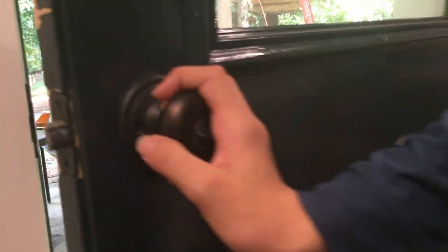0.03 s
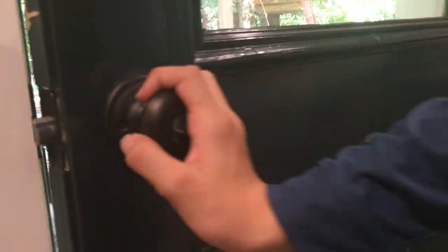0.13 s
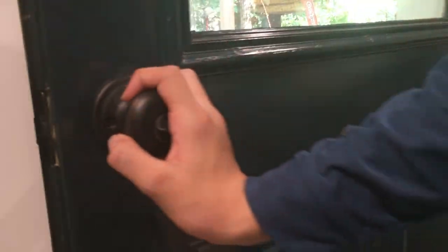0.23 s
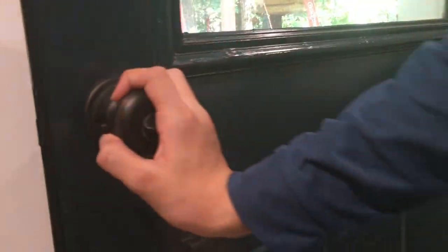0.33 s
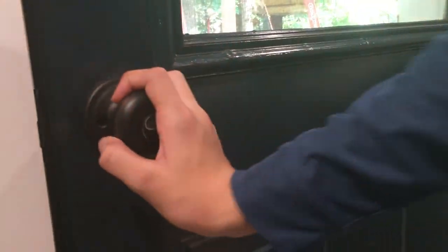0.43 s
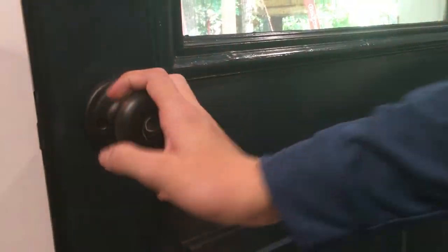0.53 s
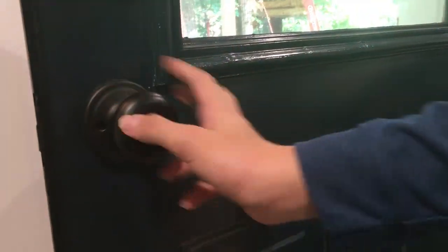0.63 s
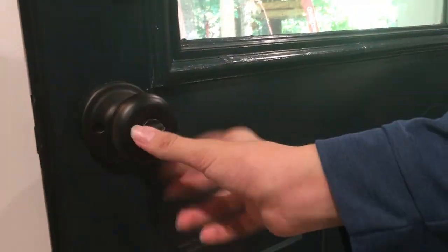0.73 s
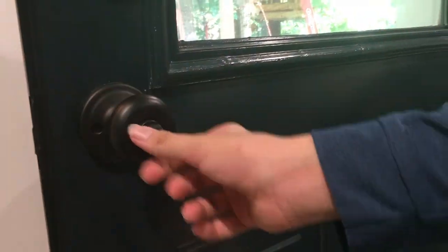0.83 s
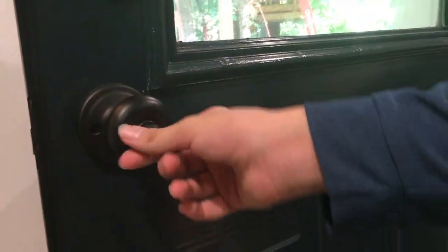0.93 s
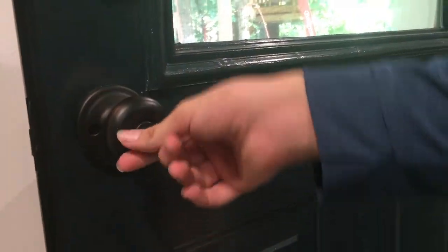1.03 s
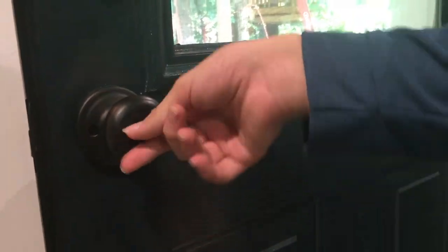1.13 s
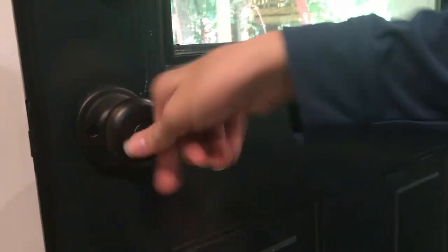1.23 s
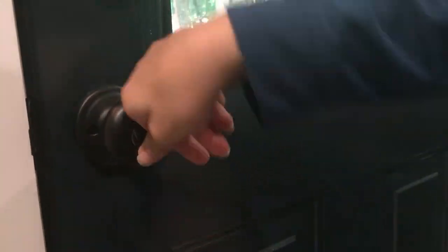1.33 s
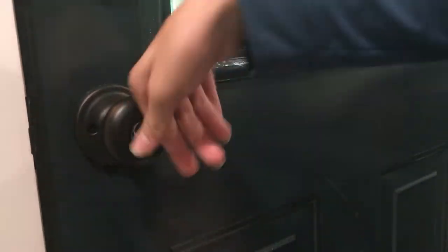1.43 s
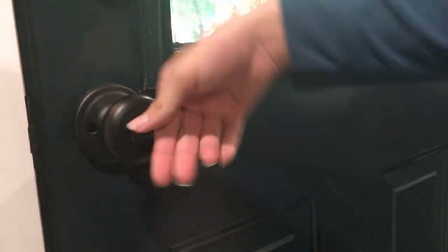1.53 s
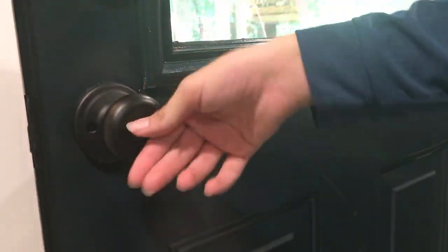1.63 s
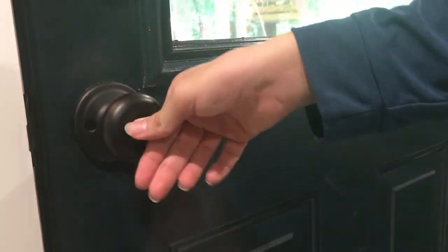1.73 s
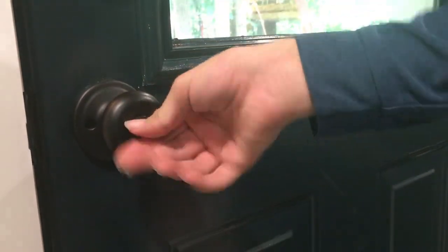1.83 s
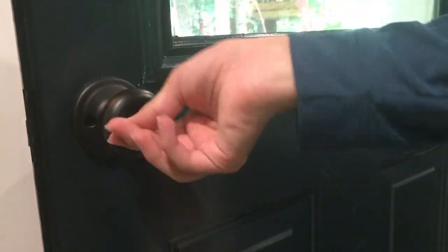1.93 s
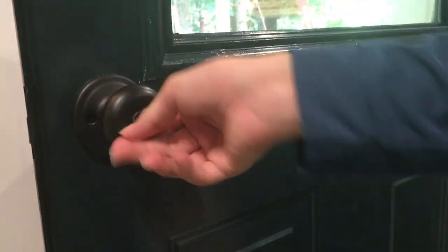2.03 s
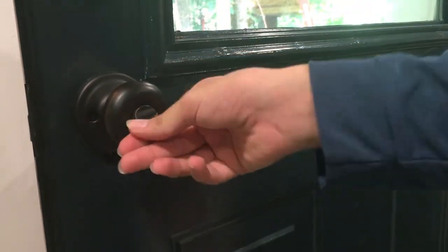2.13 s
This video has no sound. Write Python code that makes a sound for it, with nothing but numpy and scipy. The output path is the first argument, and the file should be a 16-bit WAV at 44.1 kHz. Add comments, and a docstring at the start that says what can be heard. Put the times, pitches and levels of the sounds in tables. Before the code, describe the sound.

A door shuts close by in a small, quiet hallway. Latch clacks hit the strike plate at 0.19-0.3 s, then the loudest woody thud and sharp metal snap at 0.37-0.38 s, with a low boom fading and final clacks by 0.44 s. Soft ticks follow at 0.6-0.9 s, clearer loose knob clicks at 1.14-1.64 s, brief low creaks near 1.67 and 2.09 s, and faint clicks around 2.0 s.

```python
"""House door shut by its knob

Close by, the latch meets the strike plate, the door thuds into its frame and the bolt snaps home. The hand
lets go, then fingers turn the lock button in the knob. Contacts are shaped noise bursts plus decaying tones;
thuds are low modes; slides, hiss, cloth and groans are swelling noise. A small hallway rings after every contact."""
import sys
import numpy as np
from scipy import signal
from scipy.fft import rfft, irfft, next_fast_len
from scipy.io import wavfile
from scipy.ndimage import uniform_filter1d, map_coordinates

SR = 44100
rng = np.random.default_rng(int(sys.argv[2]) if len(sys.argv) > 2 else 0)


def store_wav(level_fs):
    """Save 16-bit WAV to argv[1]."""
    pcm = np.round(np.clip(np.atleast_2d(level_fs), -1, 1) * 32767)
    wavfile.write(sys.argv[1], SR, pcm.T.astype(np.int16))


N = 97020  # length [samples]

# Still air of the house: (frequency [Hz], level [dB])
AIR_COLOUR = [(25, -8), (92, -1.5), (400, -11.5), (900, -22.5), (2840, -26.5), (5000, -35), (10100, -24.5),
              (16000, -47)]
AIR_DB = -65.5

# Decay of the hallway tail: (frequency [Hz], t60 [s])
HALL_T60 = [(100, 1), (400, 0.19), (1500, 0.5), (4000, 0.34), (10000, 0.27), (15000, 0.45)]
# Hallway tail over the direct sound: (frequency [Hz], level [dB])
HALL_LEVEL = [(80, -1.5), (300, -6), (1000, -6.5), (2500, -15), (6000, -13), (15000, -22)]
EARLY_DB, EARLY_T60_S, WALL_RISE_S = -8.5, 0.074, 0.0013

# Sleeve and door moving: (middle [s], half length [s], level [dB])
SWISHES = [(.05, 0.056, -64), (.16, 0.02, -87), (.32, 0.093, -47), (1.08, 0.05, -67.5),
           (1.92, 0.083, -66.5), (2.12, 0.13, -68.5)]
# Colour of that movement: (frequency [Hz], level [dB])
SWISH_COLOUR = [(40, -9), (150, 2), (400, -3), (1500, -12.5), (3000, -17.5), (4200, -29), (7000, -24),
                (11000, -27.5), (16000, -41.5)]
# Metal and skin sliding, and the slam's fading treble hiss (.505): (middle [s], half length [s], level [dB])
SLIDES = [(.435, 0.0029, -37), (.505, 0.042, -61), (.592, 0.0098, -58.5), (.707, 0.0047, -64.5),
          (1.905, 0.038, -64), (1.995, 0.024, -67)]
# Colour of the sliding and the hiss: (frequency [Hz], level [dB])
SLIDE_COLOUR = [(500, -20.5), (2500, -12), (4500, -15.5), (6500, -5), (8000, -6.5), (10500, 1.5),
                (12500, -16), (16000, -20.5)]
# The bolt rubs in its case: (middle [s], half length [s], level [dB])
SCRAPES = [(1.128, 0.0033, -58.5), (1.305, 0.0092, -61)]
# Colour of the bolt's rub: (frequency [Hz], level [dB])
SCRAPE_COLOUR = [(500, -24.5), (1500, -10.5), (2800, 5.5), (4200, -15.5), (6500, -9.5), (16000, -39)]
# Hinge and spindle groan as they turn: (middle [s], half length [s], level [dB], pitch [Hz])
GROANS = [(.11, 0.06, -65.5, 792), (1.672, 0.02, -51.5, 285), (1.895, 0.016, -63, 520),
          (1.961, 0.055, -65, 329), (2.093, 0.015, -50.5, 341)]
GROAN_WIDTH_HZ = 53  # 6 dB down this far from the pitch

# The leaf meets the bolt, the seal, then the frame: (time [s], leaf flex [dB], hallway boom [dB])
THUDS = [(0.194, -27.5, -55.5), (0.301, -37.5, -53), (.384, -25.5, -27.5)]
# Flexing of the door leaf: (frequency [Hz], level [dB], t60 [s])
LEAF_MODES = [(70, -15.5, 0.46), (126, 3.5, 0.15), (171, -13.5, 0.16)]
LEAF_RISE_S = 0.0048
# Low modes of door and hallway: (frequency [Hz], level [dB], t60 [s], rise [s])
DOOR_MODES = [(66.8, 4.5, .6, 0.0047), (130.8, 1, 0.64, 0.026), (171.8, -3.5, 0.56, 0.021),
              (197.8, -15.5, .9, 0.011), (243, -12, 0.42, 0.0033)]
# Colour of the boom: (frequency [Hz], level [dB])
BOOM_COLOUR = [(20, -24.5), (40, -2), (70, 1), (115, 3), (200, -14.5), (700, -62.5)]
BOOM_DB, BOOM_T60_S, BOOM_RISE_S = 2, 0.59, 0.0051  # level is over the hallway boom of each thud

# Latch and door strike the frame: (time [s], steel tick [dB], tick centre [Hz], lock clack [dB],
# clack centre [Hz], door wood [dB])
STRIKES = [ (.1862, -37.5, 5740, -32, 2700, -53.5), (.1922, -67.5, 7180, -36, 2050, -37.5),
           (.2117, -27, 5935, -32, 2620, -42), (.2131, -25, 10280, -39, 2486, -39.5),
           (.25, -38, 7186, -48.5, 2073, -45), (.3025, -78.5, 8070, -44, 1004, -50.5),
           (.3658, -19.5, 8845, -29, 2239, -29), (.3672, -31.5, 6883, -21.5, 800, -18.5),
           (.3688, -28.5, 6714, -21, 2096, -26), (.3798, -34.5, 7660, -15.5, 2400, -29.5),
           (.3811, -24.5, 8460, -27.5, 2543, -34.5), (.4242, -42.5, 7280, -28.5, 2430, -37.5),
           (.4425, -39.5, 7000, -34, 1830, -37)]
# Fingers leave the knob, then turn its lock button: (time [s], steel tick [dB], tick centre [Hz],
# knob clack [dB], clack centre [Hz], door wood [dB])
KNOB_CLICKS = [ (.6010, -45, 11800, -71, 2507, -62), (.6457, -58, 13080, -66, 2465, -79),
               (.8847, -54, 6440, -59.5, 2580, -61.5), (1.1408, -68, 8900, -47, 946, -42.5),
               (1.2122, -47.5, 7800, -36, 1050, -45), (1.2282, -49, 8600, -37.5, 2155, -37),
               (1.233, -69, 8930, -40.5, 890, -42), (1.2732, -58.5, 8900, -57, 1986, -81),
               (1.3158, -59, 7000, -41, 1870, -39.5), (1.3225, -59, 6410, -37.5, 682, -43.5),
               (1.466, -65, 6980, -56.5, 1820, -85), (1.5390, -60.5, 7870, -44, 2043, -46),
               (1.5440, -65.5, 7980, -41, 1583, -54.5), (1.6380, -65.5, 9900, -47.5, 1030, -47),
               (1.986, -66, 8970, -54, 1006, -53), (2.0418, -51, 9000, -52.5, 2550, -52),
               (2.063, -67, 7980, -55, 1430, -52), (2.079, -56.5, 9300, -55, 2340, -58)]

# Colour of the steel tick: (frequency [Hz], level [dB])
TICK_COLOUR = [(1500, -43.5), (4000, -11.5), (5000, -1.5), (6400, -0.5), (7500, -5.5), (8800, -4),
               (10200, 2.5), (12000, -2.5), (13500, -15.5), (16000, -12)]
# Colour of the lock clack: (frequency [Hz], level [dB])
LOCK_COLOUR = [(150, -30.5), (500, 3.5), (1600, 1), (2400, -4.5), (3150, -5), (4000, -13.5), (5500, -9.5),
               (9000, -40.5)]
# Colour of the knob clack: (frequency [Hz], level [dB])
KNOB_COLOUR = [(200, -10), (520, 9.5), (800, -3), (1600, -6), (2400, -6), (3300, -8.5), (4000, -18),
               (9000, -67)]
# Colour of the door's wood: (frequency [Hz], level [dB])
WOOD_COLOUR = [(40, -17.5), (110, -1), (200, 0.5), (340, -2.5), (430, -5), (800, -7), (1500, -37.5),
               (4000, -57.5)]
TICK_T60_S, CLACK_T60_S, WOOD_T60_S = 0.0019, 0.0059, 0.088
TICK_RISE_S, CLACK_RISE_S, WOOD_RISE_S = 0.00047, 0.0004, 0.00074
# The first clean push of a contact, over the noise that follows [dB]
TICK_SNAP_DB, CLACK_SNAP_DB, WOOD_SNAP_DB = -8, -4.5, -5.5
TICK_OCTAVES, CLACK_OCTAVES = 0.88, 1.2  # width of the emphasis round the centre
EMPHASIS_DB = 25.5  # depth of a contact's emphasis
AFTER_DB, AFTER_LONGER = -17, 7.1  # after the crack, the part shivers on softer and this many times longer
EVEN_HZ = 890  # the noise is evened out over stretches this wide before it is coloured

# Narrow peaks that colour the strikes, as two like hits close together do:
# (frequency [Hz], level [dB], t60 [s])
STRIKE_PEAKS = [(1033, -20, .14), (1348, -20, .16), (1848, -22, .14), (2014, -20, .13), (2197, -18, .14),
                (2283, -20, .15), (2441, -20, .15), (3080, -19, .06)]
# Ringing of the free knob, which sags in pitch as it fades: (frequency [Hz], level [dB], t60 [s])
KNOB_MODES = [(540, -16, .1), (690, -17, .11), (1080, -23, .08), (1580, -16, .17), (1690, -14.5, .19)]
# Ringing of the latch spring: (frequency [Hz], level [dB], t60 [s])
SPRING_MODES = [(4450, -22, .04), (6126, -33, .25), (6350, -20, .08)]
# Ringing of the door panel round the lock: (frequency [Hz], level [dB], t60 [s])
PANEL_MODES = [(243, -14.5, .12), (298.6, -13.5, .18), (375.8, -11.5, .22)]
STRIKE_PEAKS_DB, KNOB_RING_DB = -4, 2.5  # tones over the clack
RING_WIDTH_HZ = 8.8  # loose parts never ring quite pure
KNOB_SAG_PER_S = 1.1  # share of the pitch lost each second
DETUNE = 0.02203  # share of pitch: the loose knob sits a little differently at each contact

LOW_CUT_HZ, TOP_HZ = 24, 16300


def amp(db):
    """Turn dB into gain."""
    return 10 ** (np.asarray(db) / 20)


def unit(x):
    """Scale to rms 1."""
    return x / np.sqrt(np.mean(x ** 2) + 1e-20)


def along(points, hz):
    """Read (frequency, value) points on a log frequency axis."""
    f, value = np.transpose(points)
    return np.interp(np.log(hz + 1), np.log(f + 1), value)


def coloured(x, curve_db):
    """Causal minimum-phase filter whose gain in dB is a function of frequency."""
    m = 2 * next_fast_len(len(x))
    cepstrum = irfft(np.log(amp(curve_db(np.fft.rfftfreq(m, 1 / SR))) + 1e-6))
    # Folding the cepstrum forward puts the whole response after the input
    cepstrum[1:m // 2] *= 2
    cepstrum[m // 2 + 1:] = 0
    return irfft(rfft(x, m) * np.exp(rfft(cepstrum)))[:len(x)]


def noise(spectrum, size=N):
    """Coloured noise of rms 1."""
    return unit(coloured(rng.standard_normal(size), lambda hz: along(spectrum, hz)))


def fall(t, t60, rise):
    """Quick rise, exponential decay."""
    return (1 - np.exp(-t / rise)) * np.exp(-np.log(1000) * t / t60)


def swell(t, middle, half):
    """Bell-shaped swell and fade round a middle."""
    return np.exp(-.5 * ((t - middle) / half) ** 2)


def add(track, s, sound):
    """Mix a sound in at time s."""
    i = round(s * SR)
    track[i:i + len(sound)] += sound[:N - i]


def house_air():
    """Steady coloured noise: the quiet of the house."""
    return amp(AIR_DB) * noise(AIR_COLOUR)


def hallway(x):
    """Direct sound, close reflections and a tail that dies by frequency."""
    t = np.arange(len(x)) / SR
    hz, s, z = signal.stft(rng.standard_normal(len(x)), SR, nperseg=256)
    t60 = along(HALL_T60, hz)[:, None]
    # The root gives each decay an energy of 1, so the level does not hang on its length
    gain = amp(along(HALL_LEVEL, hz))[:, None] * np.sqrt(2 * np.log(1000) / (t60 * SR))
    decaying = z * gain * np.exp(-np.log(1000) * s / t60)
    tail = signal.istft(decaying, SR, nperseg=256)[1][:len(x)]
    early = rng.standard_normal(len(x)) * fall(t, EARLY_T60_S, WALL_RISE_S)
    early = amp(EARLY_DB) * early / np.linalg.norm(early)
    answer = tail * (1 - np.exp(-t / WALL_RISE_S)) + early
    return x + signal.fftconvolve(x, answer)[:len(x)]


def rubbing(strokes, spectrum, grain_db, grains_per_s):
    """Strokes of noise that swell and fade, their level flickering at random in dB."""
    t = np.arange(N) / SR
    level = sum(amp(db) * swell(t, middle, half) for middle, half, db in strokes)
    grain = map_coordinates(rng.standard_normal(N), [t * grains_per_s], order=1)
    return level * unit(noise(spectrum) * amp(grain_db * grain))


def sleeve():
    """Sleeve and door brush past as soft, broad noise."""
    return rubbing(SWISHES, SWISH_COLOUR, grain_db=2, grains_per_s=200)


def slides():
    """Fine-grained slides and the slam's fading treble hiss; the bolt scrapes with a rougher, faster grain."""
    slides_and_hiss = rubbing(SLIDES, SLIDE_COLOUR, grain_db=3.0, grains_per_s=200)
    bolt = rubbing(SCRAPES, SCRAPE_COLOUR, grain_db=7.0, grains_per_s=1100)
    return hallway(slides_and_hiss + bolt)


def groans():
    """A turning part rubs out a short, low, rough note: noise narrowed round a pitch."""
    out, t = np.zeros(N), np.arange(N) / SR
    for middle, half, db, pitch_hz in GROANS:
        note = coloured(rng.standard_normal(N),
                        lambda hz: -20 * np.log10(1 + ((hz - pitch_hz) / GROAN_WIDTH_HZ) ** 2))
        out += amp(db) * swell(t, middle, half) * unit(note)
    return out


def low_mode(t, hz, db, t60, rise):
    """One decaying sine of a large, slow body."""
    return amp(db) * fall(t, t60, rise) * np.sin(2 * np.pi * hz * t)


def door():
    """The leaf flexes at each push, and the hard stop sets the hallway's low modes booming."""
    out, t = np.zeros(N), np.arange(SR) / SR
    for s, leaf_db, hall_db in THUDS:
        leaf = sum(low_mode(t, hz, db, t60, LEAF_RISE_S) for hz, db, t60 in LEAF_MODES)
        modes = sum(low_mode(t, *mode) for mode in DOOR_MODES)
        boom = amp(BOOM_DB) * noise(BOOM_COLOUR, size=SR) * fall(t, BOOM_T60_S, BOOM_RISE_S)
        add(out, s, amp(leaf_db) * leaf + amp(hall_db) * (modes + boom))
    return out


def hump(centre_hz, octaves):
    """A broad emphasis in dB: hard contacts sit high, soft ones low."""
    return lambda hz: EMPHASIS_DB / (1 + (np.log2((hz + 1) / centre_hz) / octaves) ** 2)


def burst(part, spectrum, t60, rise, snap_db, emphasis=lambda hz: 0):
    """Noise burst of one part: a push, a crack and its shiver, with the energy of 4 ms at level 1."""
    size = len(part)
    t = np.arange(size) / SR
    crack = fall(t, t60, rise)
    shiver = amp(AFTER_DB) * fall(t, AFTER_LONGER * t60, rise)
    x = part * np.hypot(crack, shiver)
    x[0] = -amp(snap_db) * np.linalg.norm(x)  # the clean push
    # Even out the spectrum before colouring it
    stretch = int(EVEN_HZ * 2 * size / SR)
    power = np.abs(uniform_filter1d(np.abs(rfft(x, 2 * size)) ** 2, stretch))
    uneven_db = 10 * np.log10(power / power.mean() + 1e-9)
    x = coloured(x, lambda hz: along(spectrum, hz) + emphasis(hz) - uneven_db)
    return x / np.linalg.norm(x) * np.sqrt(.004 * SR)


def ring(modes, t, sag=0, scatter_db=2):
    """Tones with wandering phase, their levels new at each contact; pitch falls by the share sag a second."""
    step = np.sqrt(2 * np.pi * RING_WIDTH_HZ / SR)
    detune = 1 + DETUNE * (sag > 0) * rng.normal()  # only a sagging part is detuned
    clock = (t - sag * t ** 2 / 2) * detune
    out = np.zeros(len(t))
    for hz, db, t60 in modes:
        level = amp(db + scatter_db * rng.normal())
        wander = step * np.cumsum(rng.standard_normal(len(t)))
        tone = np.sin(2 * np.pi * (hz * clock + rng.random()) + wander)
        out += level * fall(t, t60, CLACK_RISE_S) * tone
    return out


def contacts(rows, clack_colour, tones, tones_db, sag=0, size=8192):
    """Each contact ticks the steel, clacks with its decaying tones, and knocks the door's wood."""
    out, t = np.zeros(N), np.arange(2 * SR // 3) / SR
    case = rng.choice([-1, 1], size)  # the same case answers every contact
    for s, tick_db, tick_hz, clack_db, clack_hz, wood_db in rows:
        steel, wood = rng.choice([-1, 1], (2, size))
        tick = burst(steel, TICK_COLOUR, TICK_T60_S, TICK_RISE_S, TICK_SNAP_DB, hump(tick_hz, TICK_OCTAVES))
        clack = burst(case, clack_colour, CLACK_T60_S, CLACK_RISE_S, CLACK_SNAP_DB,
                      hump(clack_hz, CLACK_OCTAVES))
        knock = burst(wood, WOOD_COLOUR, WOOD_T60_S, WOOD_RISE_S, WOOD_SNAP_DB)
        sound = amp(clack_db + tones_db) * ring(tones, t, sag)
        sound += amp(tick_db) * ring(SPRING_MODES, t)
        sound += amp(wood_db) * ring(PANEL_MODES, t)
        add(sound, 0, amp(tick_db) * tick + amp(clack_db) * clack + amp(wood_db) * knock)
        add(out, s, hallway(sound))
    return out


def knob_clicks():
    """Small clicks of the free knob and its lock button, ringing with a sagging pitch."""
    return contacts(KNOB_CLICKS, KNOB_COLOUR, KNOB_MODES, KNOB_RING_DB, KNOB_SAG_PER_S)


def latch_strikes():
    """Latch, door and bolt hit the frame, coloured by narrow peaks as two like hits close together are."""
    return contacts(STRIKES, LOCK_COLOUR, STRIKE_PEAKS, STRIKE_PEAKS_DB)


def scene():
    """Door, hardware and hand over the quiet of the house, as one channel."""
    background = house_air() + sleeve() + slides() + groans()
    return (background + door() + knob_clicks() + latch_strikes())[None]


def record(dry):
    """Cut the deepest bass gently and everything above the band limit steeply."""
    m = next_fast_len(N + SR // 2)
    x = signal.sosfilt(signal.butter(2, LOW_CUT_HZ, "highpass", fs=SR, output="sos"), dry)
    gain = 1 / (1 + (np.fft.rfftfreq(m, 1 / SR) / TOP_HZ) ** 120)
    return irfft(rfft(x, m) * gain, m)[..., :N]


dry = scene()
out = record(dry)
store_wav(out)
```